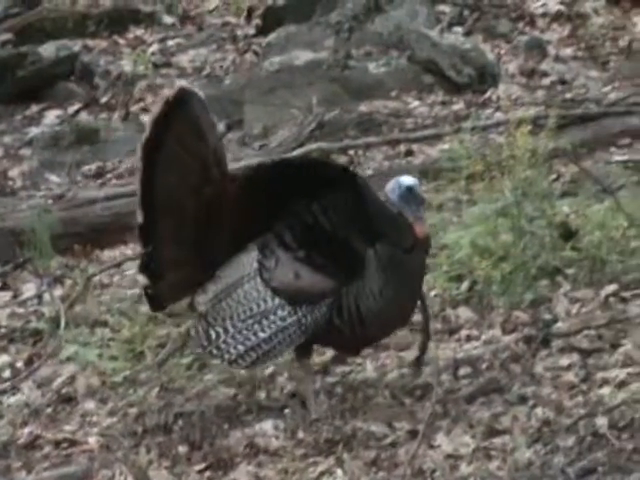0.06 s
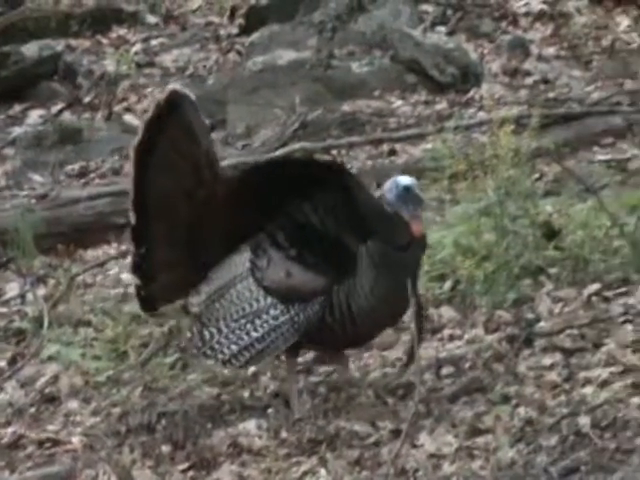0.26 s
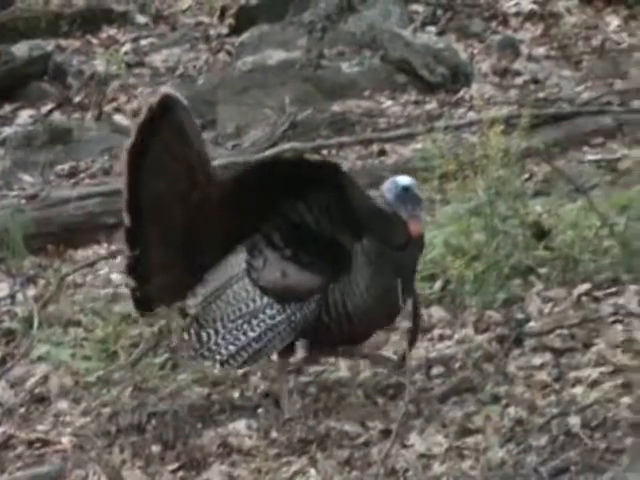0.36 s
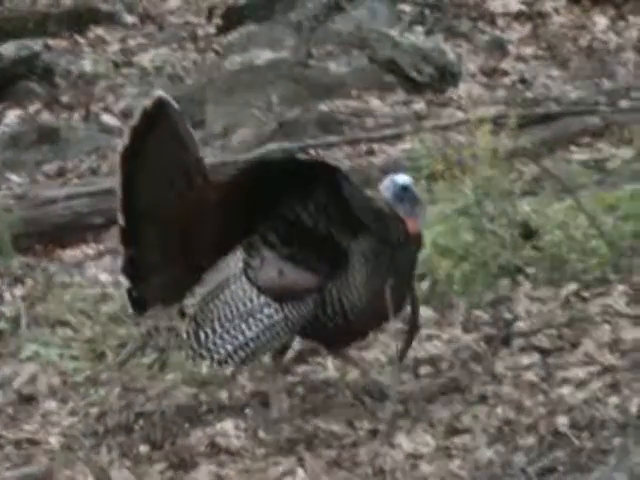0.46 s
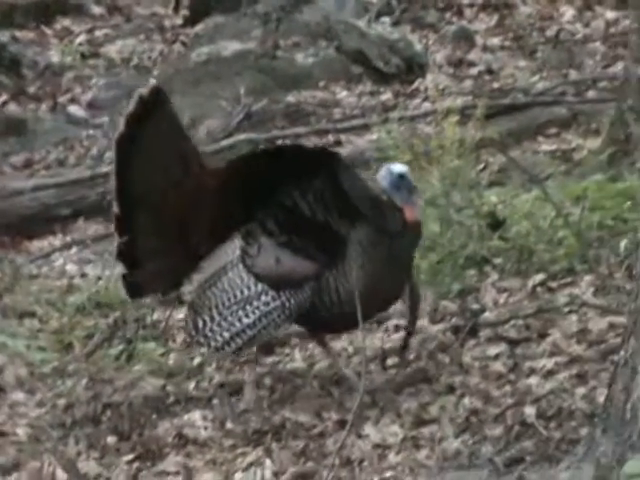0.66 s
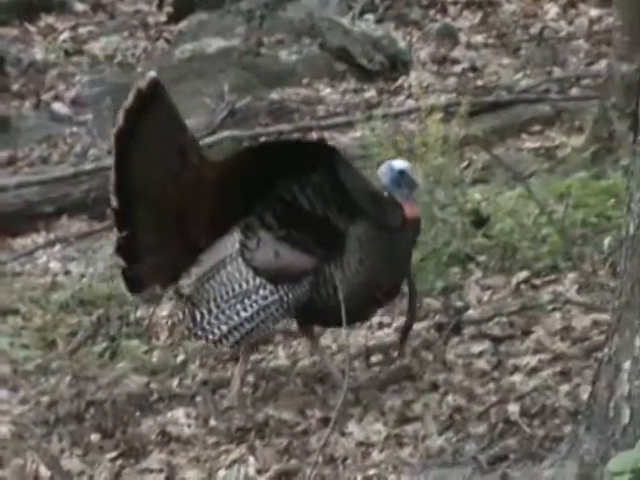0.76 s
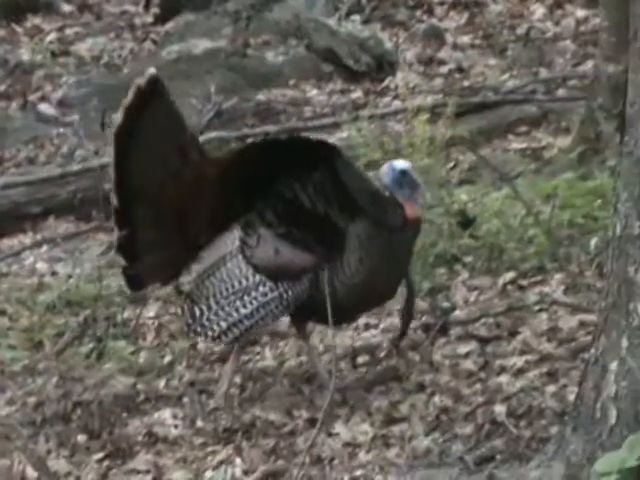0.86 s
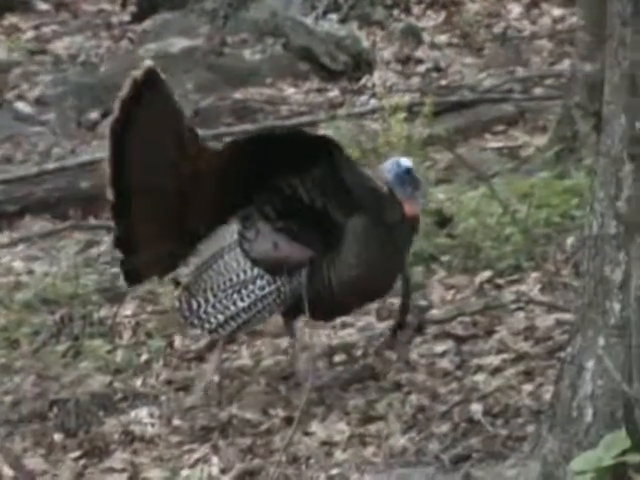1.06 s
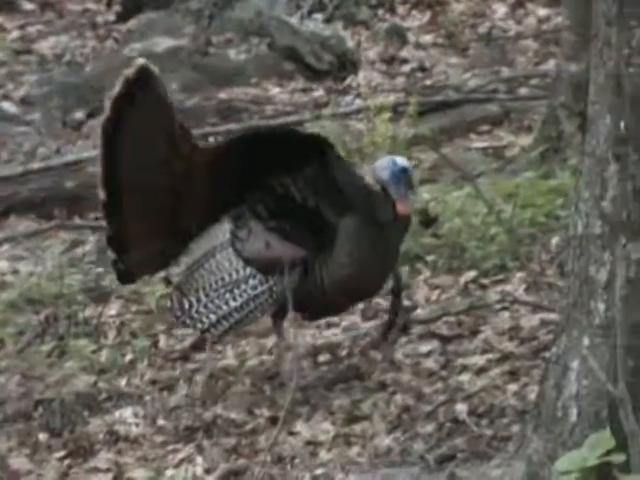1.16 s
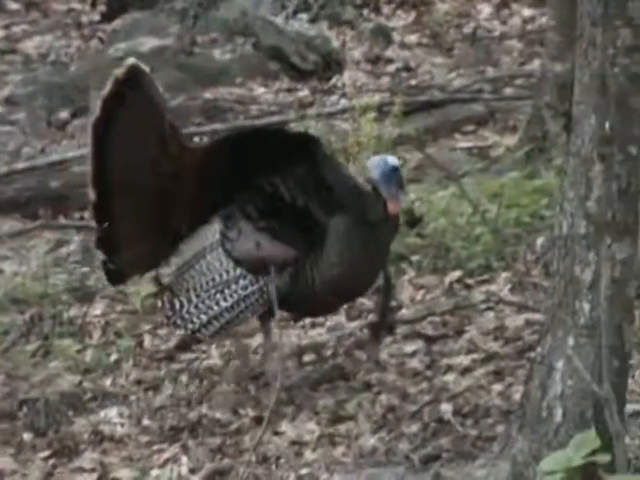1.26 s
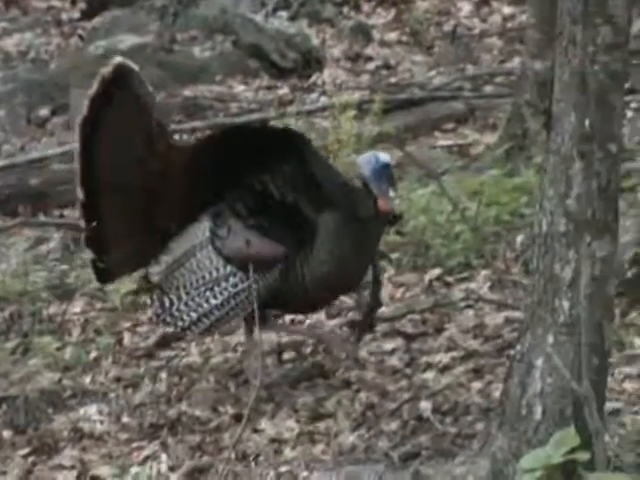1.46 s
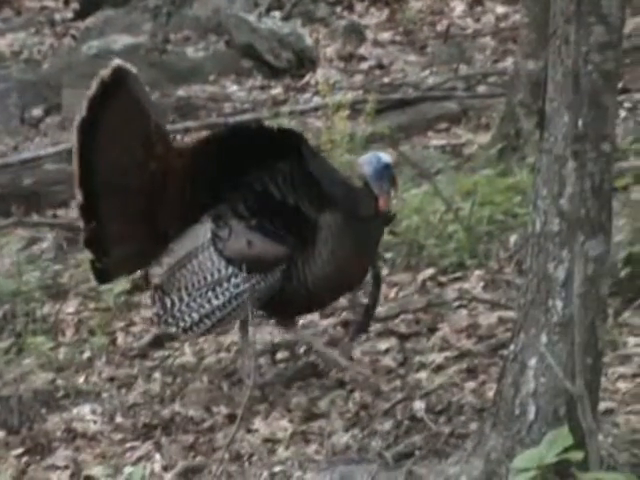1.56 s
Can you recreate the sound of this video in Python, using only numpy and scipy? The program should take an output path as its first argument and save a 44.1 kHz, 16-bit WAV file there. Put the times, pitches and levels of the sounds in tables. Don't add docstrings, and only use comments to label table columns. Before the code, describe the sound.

After a brief high songbird slur, a turkey gobbles once, a fast burst of hollow throaty pops. Then faint bird calls, light leaf scrapes and twig ticks continue in open woodland, with constant microphone hiss.

```python
import sys
import numpy as np
from scipy import signal
from scipy.fft import rfft, irfft
from scipy.io import wavfile
from scipy.ndimage import uniform_filter1d

SR = 44100
rng = np.random.default_rng(int(sys.argv[2]) if len(sys.argv) > 2 else 0)


def invert_db(x):
    u = np.asarray(x, float) / 20
    return 10 ** u


def wav_out(sig):
    wavfile.write(sys.argv[1], SR, np.round(np.clip(np.atleast_2d(sig).T, -1, 1) * 32767).astype(np.int16))


N = 70560


def band(x, hz, width):
    edges = [max(hz - width / 2, 10), min(hz + width / 2, .45 * SR)]
    return signal.sosfilt(signal.butter(2, edges, "band", fs=SR, output="sos"), x)


def unit(x):
    return x / np.sqrt(np.mean(x ** 2))


def walk(rate):
    k = max(int(SR / rate), 1)
    return unit(uniform_filter1d(uniform_filter1d(rng.standard_normal(N), k), k))


def swell(t, rise, fall):
    return np.where(t < 0, np.exp(-.5 * (t / rise) ** 2), 1 / np.cosh(np.clip(t / fall, 0, 50)))


def place(x, pan_db, wet_db):
    t60_s, build_up_s = .5, .013
    t = np.arange(SR // 2) / SR
    decay = np.exp(-np.log(1000) * t / t60_s) * np.minimum(t / build_up_s, 1)
    tail = rng.standard_normal((2, len(t))) * decay
    tail /= np.sqrt(np.sum(tail ** 2, axis=1, keepdims=True))
    wet = signal.fftconvolve(x[None], tail, axes=1)[:, :N]
    return x * invert_db(np.array([[pan_db], [-pan_db]]) / 2) + invert_db(wet_db) * wet


def whistle(notes, waver, flutter_db):
    out, t = np.zeros(N), np.arange(N) / SR
    for note in notes:
        s, hz, db = np.array(note).T
        pitch = uniform_filter1d(np.interp(t, s, hz), size=300) * (1 + waver * walk(89))
        gate = uniform_filter1d(((t >= s[0]) & (t <= s[-1])) * 1., size=300)
        level = invert_db(np.interp(t, s, db) + flutter_db * walk(62))
        out += np.sqrt(2) * gate * level * np.sin(2 * np.pi * np.cumsum(pitch) / SR)
    return out


def air():
    # f/Hz, density/dB
    hush = [(20, -3), (42, 4.5), (60, 3.5), (500, -7.5), (1400, -8.5), (2700, -10), (12500, -19.5),
            (16000, -26.5)]
    # f/Hz, side minus mid/dB
    width = [(60, -21), (200, -6.5), (700, 5), (2400, 0.5), (8000, -4), (15000, -5)]
    f = np.log(np.fft.rfftfreq(N, 1 / SR) + 1)

    def curve(table):
        hz, db = np.array(table).T
        return invert_db(np.interp(f, np.log(hz), db))

    mid = rfft(rng.standard_normal(N)) * curve(hush)
    side = rfft(rng.standard_normal(N)) * curve(hush) * curve(width)
    both = np.array([mid + side, mid - side])
    out, breeze = 0, walk(1.9)
    for centre in np.arange(0, 11, .5):
        share = np.clip(1 - np.abs(f - centre) / .5, 0, 1)
        out = out + irfft(both * share, N) * invert_db(.4 * breeze + .6 * walk(12))
    return invert_db(-56) * unit(out)


def camcorder():
    # f/Hz, width/Hz, level/dB
    motor = [(48.7, 13, -73), (71.8, 12.6, -70)]
    # f/Hz, level/dB
    whines = [(11267, -91), (12269, -77), (12371, -90), (13275, -82), (14277, -88), (15278, -91)]
    out, t = np.zeros(N), np.arange(N) / SR
    for hz, width, db in motor:
        out += invert_db(db) * unit(band(rng.standard_normal(N), hz, width))
    for hz, db in whines:
        out += np.sqrt(2) * invert_db(db + 1.6 * walk(20)) * np.sin(2 * np.pi * hz * t)
    return out


def near_songbird():
    # t/s, f/Hz, level/dB
    slurs = [
        [(0, 5050, -64), (.012, 5300, -56), (.028, 5230, -57), (.052, 3400, -64), (.068, 3020, -59),
         (.084, 3230, -60), (.09, 3600, -60), (.096, 4300, -66), (.104, 4470, -58), (.116, 4520, -56),
         (.13, 4480, -68)],
        [(.17, 4500, -76), (.188, 4500, -70), (.198, 4500, -74)],
        [(.166, 3650, -63), (.185, 3230, -57), (.197, 2950, -62), (.205, 2700, -70), (.215, 2530, -65),
         (.225, 2550, -72)],
        [(.25, 2770, -74), (.263, 3450, -62), (.276, 3800, -63), (.298, 3630, -56), (.34, 3600, -65),
         (.38, 3700, -71)],
        [(1.435, 3200, -68), (1.445, 3310, -61), (1.49, 3290, -63), (1.53, 3300, -64), (1.6, 3260, -63)],
    ]
    return place(whistle(slurs, waver=.01, flutter_db=2), pan_db=1.0, wet_db=-4)


def leaves():
    # start t/s, length/s, level/dB, centre f/Hz
    scrapes = [(0.014, 0.073, -60, 5600), (0.489, 0.11, -64, 6000), (0.61, 0.15, -65, 6500),
               (0.767, 0.11, -66.5, 6100), (1.027, 0.157, -63.5, 6100), (1.243, 0.21, -63.5, 5960),
               (0.025, 0.012, -53.5, 255), (0.766, 0.22, -65.5, 456), (1.08, 0.14, -65, 230),
               (1.05, 0.21, -73, 3400)]
    # t/s, level/dB, f/Hz
    ticks = [(.246, -43, 6730), (1.177, -48, 5800), (1.357, -45, 3600), (1.445, -47, 2800),
             (1.166, -44, 6460), (1.34, -43.5, 6000), (1.446, -50, 6600)]
    grains_per_s, grain_db, fade_s = 6000, 1.3, .04
    out, t = np.zeros((2, N)), np.arange(N) / SR
    for s, length, db, hz in scrapes:
        hits = (rng.random((2, N)) < grains_per_s / SR) * rng.standard_normal((2, N))
        hits = hits * invert_db(grain_db * rng.exponential(size=(2, N)))
        env = np.clip(np.minimum(t - s, s + length - t) / fade_s + .5, 0, 1)
        stereo = hits[0] + 0.38 * hits[1] * np.array([[1], [-1]])
        out += invert_db(db) * env * unit(band(stereo, hz, .8 * hz))
    for s, db, hz in ticks:
        snap = rng.standard_normal(N) * (t >= s) * np.exp(-np.abs(t - s) / 0.005)
        out += invert_db(db) * band(snap, hz, 0.23 * hz)
    return out


def hooting_birds():
    # t/s, f/Hz, level/dB
    hoots = [
        [(.2, 1400, -68), (.235, 1350, -64)],
        [(.45, 1384, -64), (.49, 1420, -67), (.53, 1250, -68), (.6, 1380, -68)],
        [(.725, 1400, -62), (.75, 1400, -64), (.775, 1330, -67), (.8, 1140, -62), (.82, 1140, -68)],
        [(.75, 900, -75), (.8, 850, -71), (.87, 830, -74)],
        [(.86, 1250, -71), (.92, 1350, -69), (.97, 1300, -72)],
        [(1.0, 1200, -68), (1.03, 1414, -72), (1.09, 1391, -71)],
        [(1.1, 1264, -60), (1.12, 1537, -58), (1.14, 1580, -61.5), (1.155, 1531, -68), (1.178, 1400, -57),
         (1.21, 1260, -68)],
        [(1.26, 1257, -67), (1.29, 1662, -67), (1.32, 1450, -71)],
        [(1.38, 1400, -65), (1.41, 1594, -63), (1.45, 1620, -69), (1.51, 1450, -69)],
    ]
    return place(whistle(hoots, waver=.035, flutter_db=3), pan_db=-2, wet_db=-1)


def gobble():
    # t/s, thump level/dB, thump f/Hz, pipe ring level/dB, upper ring level/dB
    pops = [(.2275, -48, 400, -62, -62), (.236, -43, 520, -46, -47), (.2402, -39, 500, -32, -44),
            (.244, -28, 525, -52, -46), (.2475, -56, 480, -44, -50), (.2506, -45, 485, -50, -58),
            (.2569, -49, 380, -58, -66), (.2613, -42, 500, -47, -60), (.266, -34, 500, -43, -44),
            (.2698, -43, 500, -37, -41), (.275, -28, 490, -45, -44), (.289, -41, 480, -43, -66),
            (.3003, -34, 480, -34, -38), (.3033, -42, 550, -36, -44), (.3122, -27, 515, -32, -40),
            (.3172, -41, 485, -50, -62), (.3245, -48, 570, -47, -54), (.3281, -40, 490, -46, -43),
            (.3315, -41, 400, -50, -46), (.3347, -31, 430, -37, -54), (.3451, -41, 455, -44, -56),
            (.348, -50, 460, -41, -60), (.3522, -35, 465, -38, -56), (.3633, -39, 465, -41, -55),
            (.3669, -41, 525, -45, -58), (.3722, -37, 535, -37, -58), (.3837, -42, 505, -48, -61),
            (.3897, -39, 470, -40, -52), (.4007, -33, 485, -39, -57), (.405, -39, 510, -41, -60),
            (.408, -48, 510, -38, -56), (.4106, -35, 520, -46, -56), (.4234, -46, 465, -49, -66),
            (.4271, -48, 440, -47, -66), (.432, -34, 455, -38, -56), (.4444, -35, 490, -36, -58),
            (.4623, -36, 480, -50, -64), (.473, -46, 460, -50, -64), (.4856, -37, 435, -44, -66),
            (.514, -40, 450, -46, -66)]
    # f/Hz, level/dB
    upper_modes = [(1300, -12), (1660, -15), (1970, -17), (2390, -16), (2810, -23)]
    # t/s, f/Hz
    beak_glide = [(.236, 1900), (.241, 2300), (.247, 1950), (.264, 1250), (.269, 1950), (.28, 2050),
                  (.298, 2400), (.306, 2380), (.312, 1800), (.33, 1950), (.41, 2050)]
    thump_rise_s, thump_fall_s, glide_per_s = .0016, .002, 5
    sac_hz, sac_db, sac_s = 265, -13, .0022
    after_db, after_s = -16, .006
    crack_db, crack_s = -20, .0009
    ring_hz, ring_late_s, ring_rise_s, ring_fall_s = 918, .0008, .0014, .0055
    upper_rise_s, upper_fall_s, ring_waver = .001, .004, .017
    low, high, t = np.zeros(N), np.zeros(N), np.arange(N) / SR

    def tone(hz, waver):
        return np.sin(2 * np.pi * np.cumsum(hz * (1 + waver * walk(111))) / SR)

    ring = tone(ring_hz, ring_waver)
    upper = [tone(hz, .04) for hz, _ in upper_modes]
    beak = tone(np.interp(t, *np.array(beak_glide).T), ring_waver)
    after = unit(band(rng.standard_normal(N), 660, 400))
    crack = unit(band(rng.standard_normal(N), 1100, 1000))
    chance = rng.standard_normal((len(pops), 8))
    for (s, db, thump_hz, ring_db, upper_db), c in zip(pops, chance):
        near = slice(int((s - .02) * SR), int((s + .05) * SR))
        u = t[near] - s
        cycles = thump_hz * (1 + .015 * c[0]) * u * (1 + glide_per_s * u)
        thump = np.sin(2 * np.pi * cycles + .4 * c[1]) * swell(u, thump_rise_s, thump_fall_s / 2)
        sac = np.cos(2 * np.pi * sac_hz * (1 + 0.22 * c[2]) * u) * swell(u, sac_s, sac_s)
        breath = after[near] * swell(u, thump_rise_s, after_s / 2)
        low[near] += invert_db(db) * (thump - invert_db(sac_db) * sac + invert_db(after_db) * breath)
        low[near] += invert_db(db + crack_db) * crack[near] * swell(u, crack_s, crack_s)
        ring_env = swell(u - ring_late_s, ring_rise_s, ring_fall_s / 2)
        low[near] += invert_db(ring_db - 1.5) * ring[near] * ring_env
        upper_env = swell(u, upper_rise_s, upper_fall_s / 2)
        high[near] += invert_db(upper_db - 3) * beak[near] * upper_env
        for (_, own_db), mode, scatter in zip(upper_modes, upper, c[3:]):
            high[near] += invert_db(upper_db + own_db + 4 * scatter) * mode[near] * upper_env
    return low, high


def turkey():
    left_lead = -0.78
    low, high = gobble()
    bird = place(low, pan_db=2.4, wet_db=-28) + place(high, pan_db=5, wet_db=-28)
    shifted = signal.hilbert(bird) * np.exp(.5j * left_lead * np.array([[1], [-1]]))
    return shifted.real


def far_birds():
    # t/s, f/Hz, level/dB
    answers = [
        [(.41, 3700, -72), (.43, 3400, -69), (.46, 2900, -69), (.48, 2700, -75)],
        [(.56, 2700, -74), (.59, 2850, -67), (.6, 3050, -66), (.63, 3250, -64), (.79, 3230, -70)],
        [(.6, 2500, -73), (.65, 2600, -72), (.7, 2900, -71)],
        [(.92, 3400, -72), (.945, 3700, -67), (1.0, 3050, -62), (1.04, 2400, -65), (1.075, 2050, -67)],
        [(1.02, 3650, -68), (1.05, 3230, -66), (1.09, 2950, -68), (1.115, 3300, -67)],
        [(1.11, 2350, -72), (1.135, 2750, -65), (1.16, 2450, -72), (1.22, 2750, -73)],
        [(1.41, 2850, -72), (1.428, 3050, -71), (1.44, 3250, -67)],
        [(1.49, 2400, -73), (1.53, 2800, -69), (1.6, 3100, -66)],
    ]
    return place(whistle(answers, waver=.025, flutter_db=3), pan_db=0, wet_db=5)


def scene():
    birds = near_songbird() + hooting_birds() + far_birds()
    return air() + camcorder() + birds + leaves() + turkey()


def roll_off(x):
    return signal.sosfilt(signal.butter(12, 16500, fs=SR, output="sos"), x)


def record(dry):
    return roll_off(dry)


dry = scene()
out = record(dry)
wav_out(out)
```